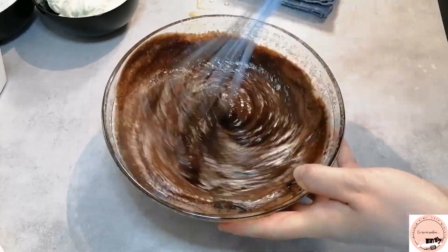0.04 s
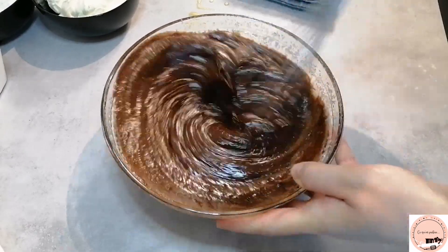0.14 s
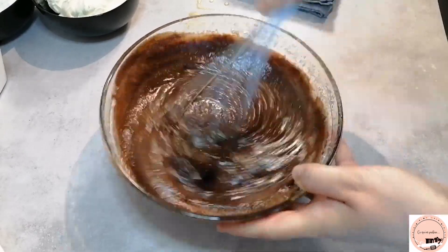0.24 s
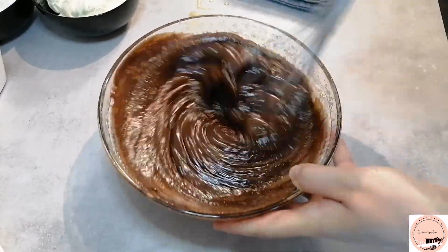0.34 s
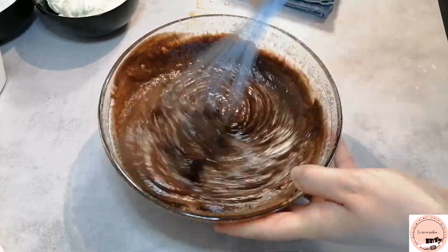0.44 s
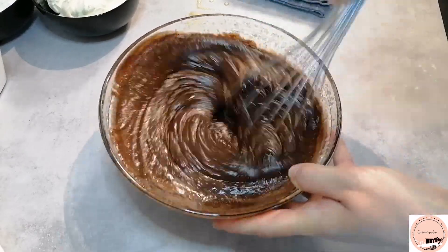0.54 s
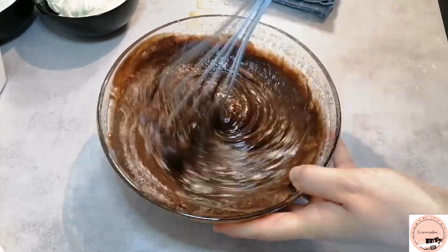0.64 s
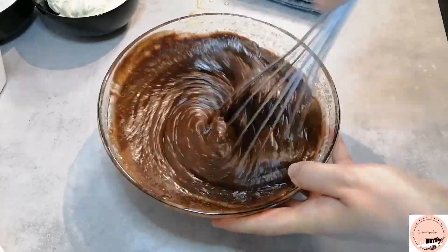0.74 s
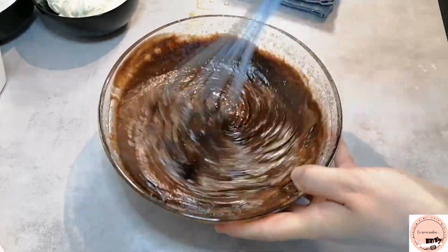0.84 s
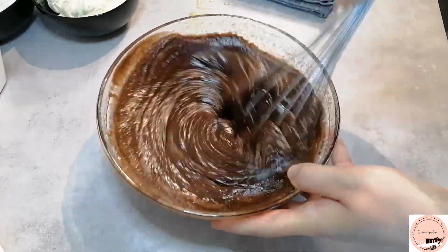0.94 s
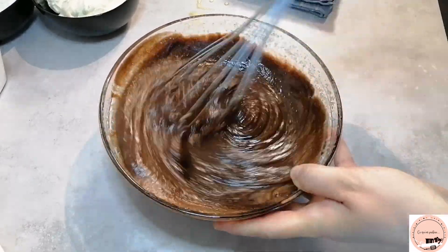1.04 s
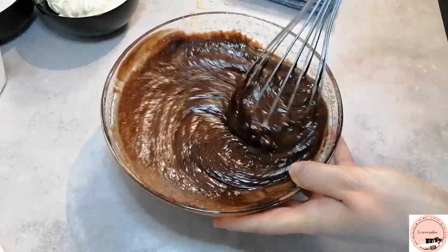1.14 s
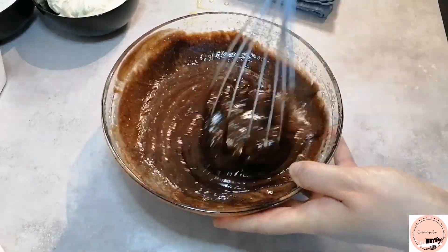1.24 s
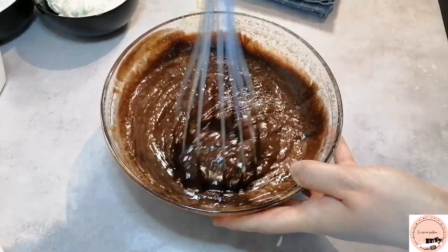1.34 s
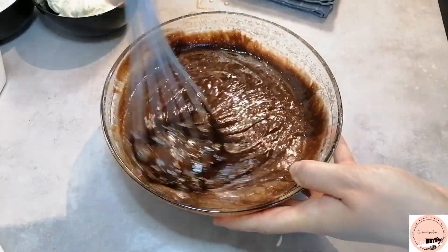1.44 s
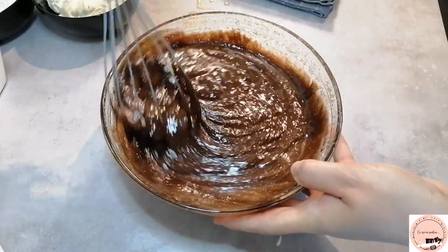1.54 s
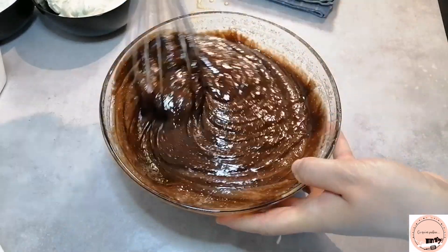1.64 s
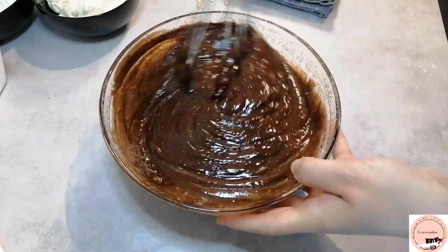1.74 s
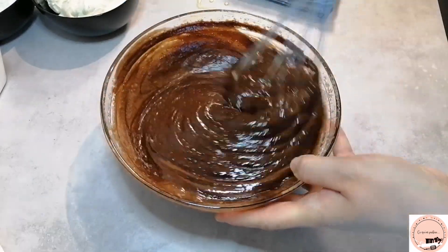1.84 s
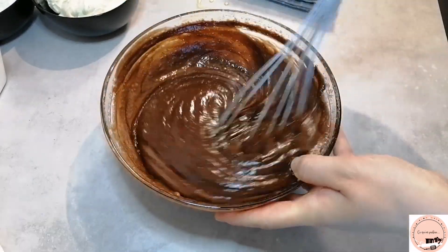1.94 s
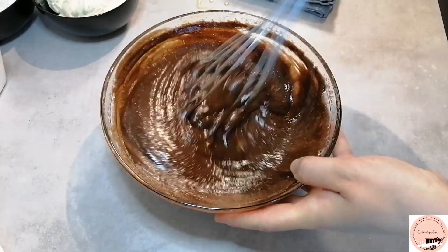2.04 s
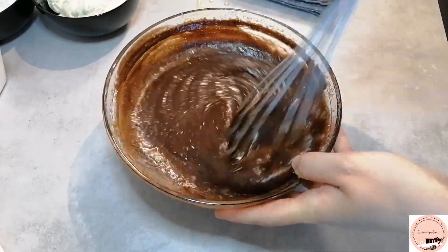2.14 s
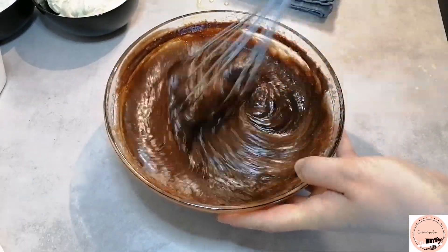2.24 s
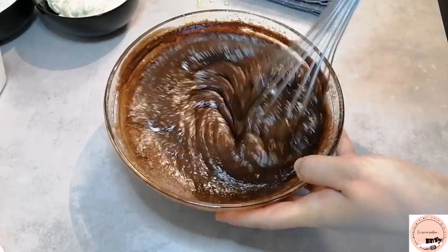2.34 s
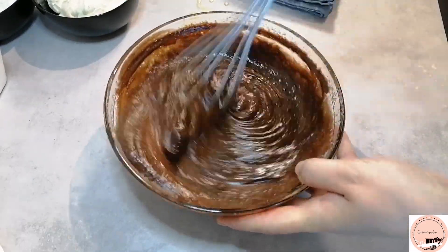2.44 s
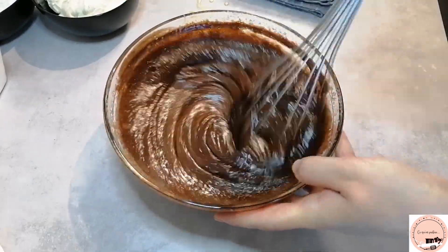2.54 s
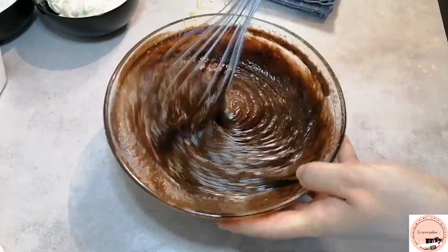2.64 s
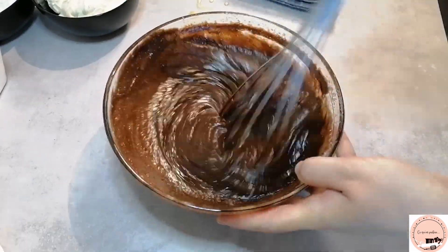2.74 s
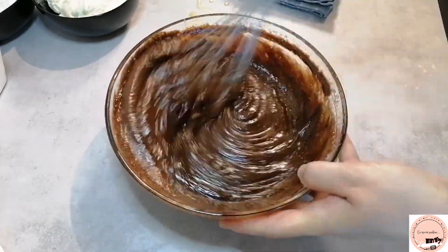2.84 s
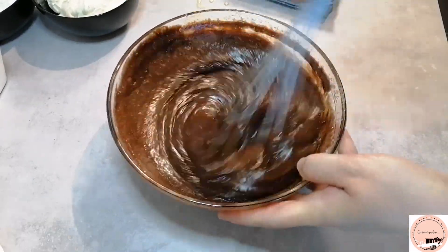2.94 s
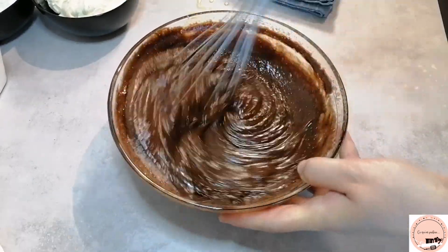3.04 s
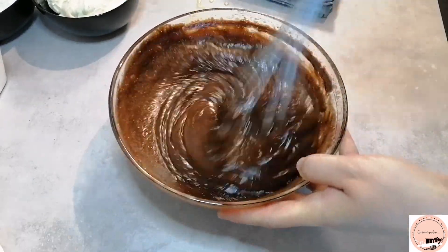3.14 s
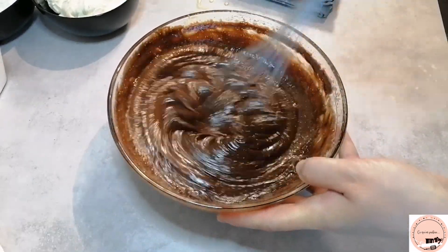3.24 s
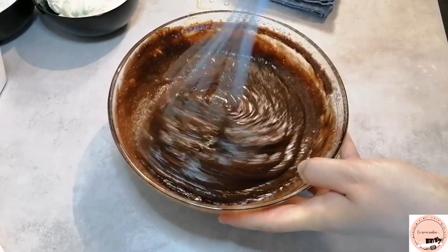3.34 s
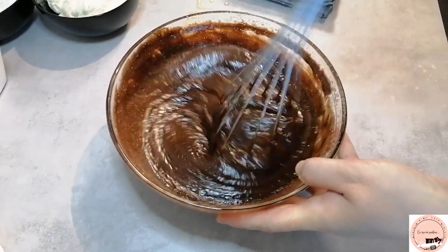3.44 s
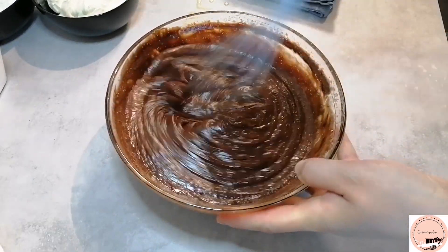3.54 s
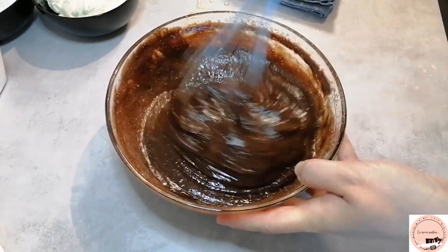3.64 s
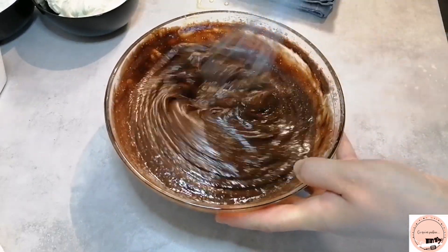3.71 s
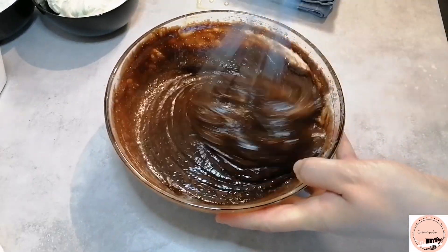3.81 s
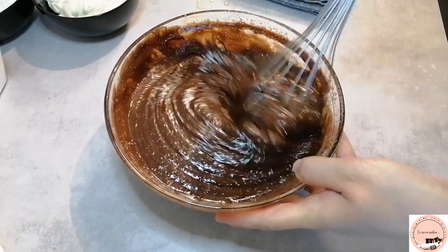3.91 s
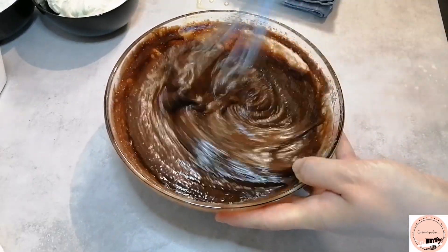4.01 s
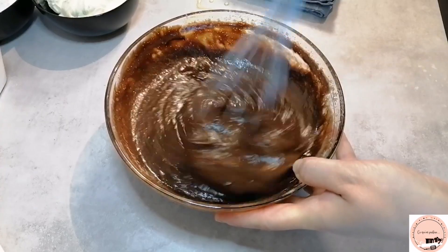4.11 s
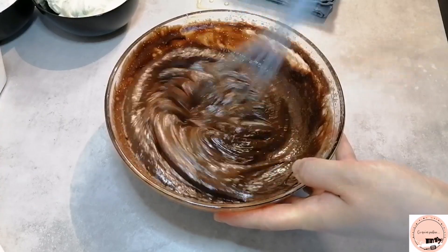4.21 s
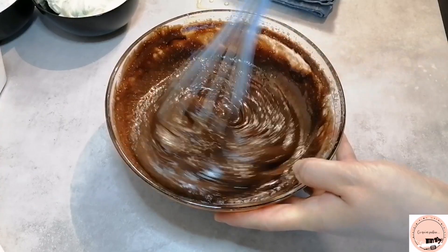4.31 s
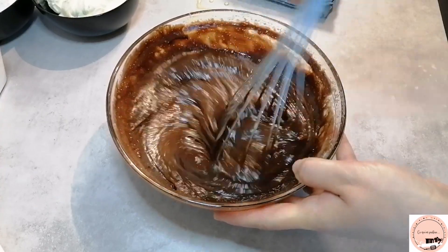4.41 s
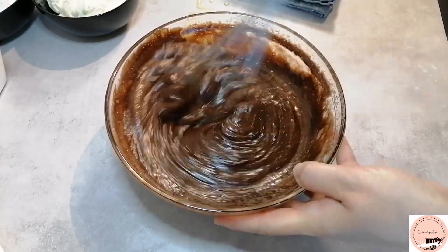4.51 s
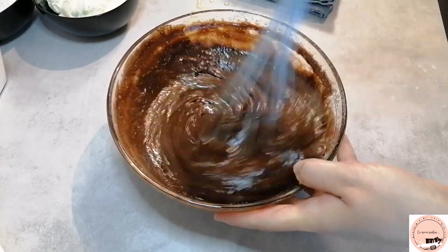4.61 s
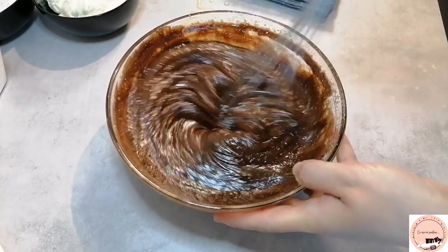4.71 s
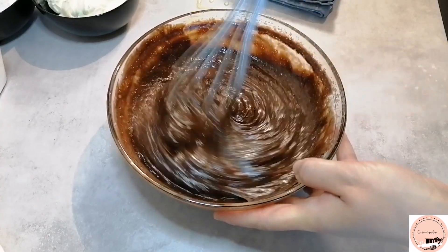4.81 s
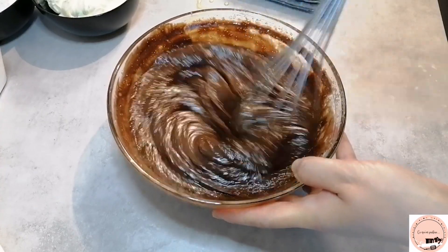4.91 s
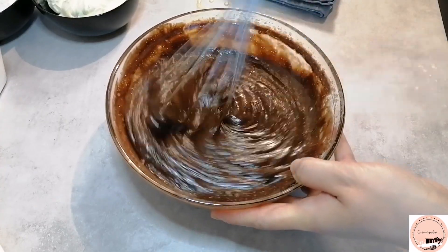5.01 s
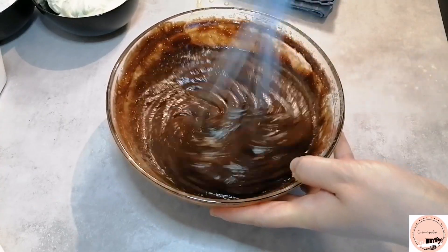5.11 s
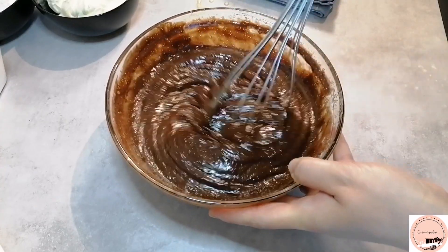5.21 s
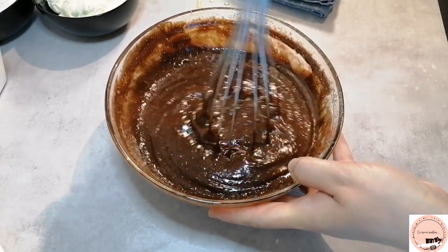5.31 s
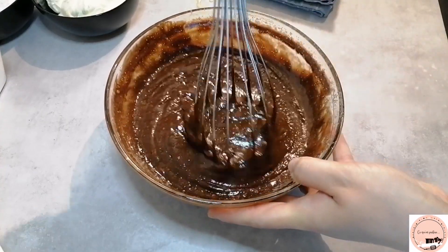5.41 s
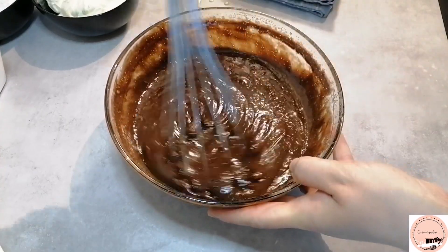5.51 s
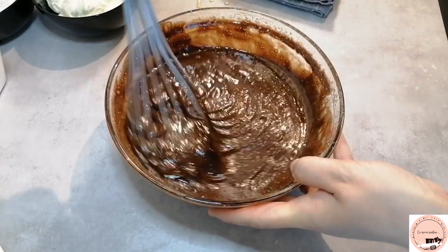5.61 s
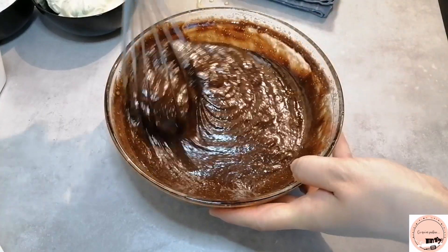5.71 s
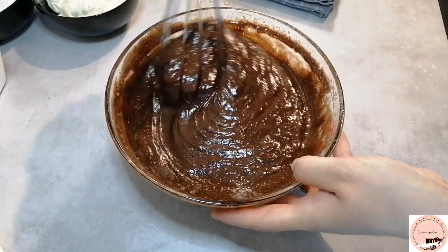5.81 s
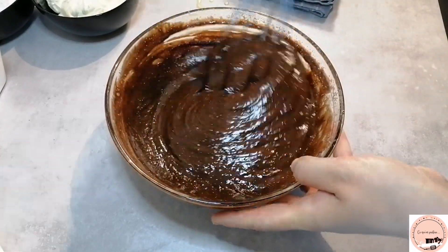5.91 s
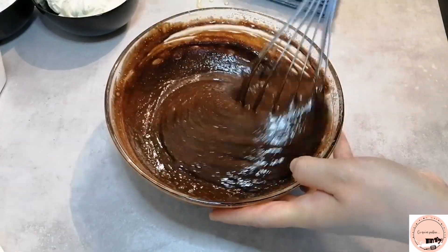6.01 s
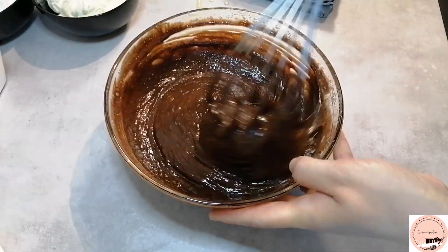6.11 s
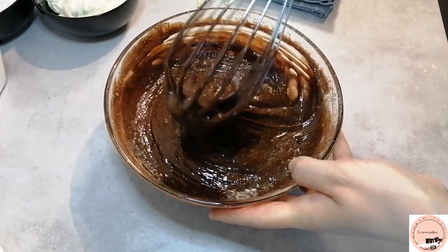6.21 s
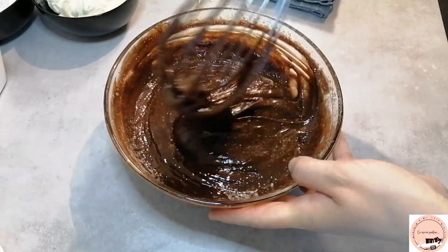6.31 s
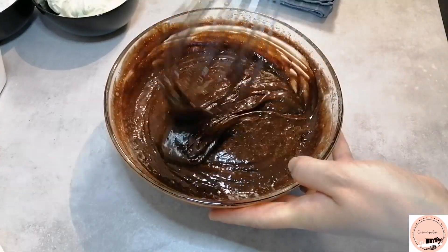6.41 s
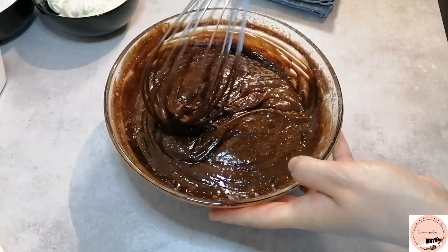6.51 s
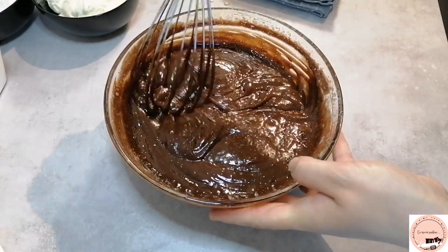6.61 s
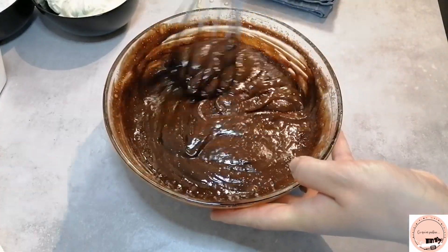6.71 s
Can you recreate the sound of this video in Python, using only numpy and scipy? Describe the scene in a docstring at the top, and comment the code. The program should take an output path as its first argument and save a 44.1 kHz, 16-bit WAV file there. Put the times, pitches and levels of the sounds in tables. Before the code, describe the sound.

A wire whisk stirs thick batter in a glass bowl with quick clinks, then beats hard and fast, then slows to scattered taps and wiry scrapes.

```python
"""A wire whisk beats thick batter in a glass bowl: stirring, then about two seconds of six hard strokes a second.
Each touch of the glass mixes a bright tick of wire, a clonk from the whisk's low notes and a thud of the bowl.
Between touches the batter churns and crackles, made from many tiny random knocks and snaps.
Now and then dragged wires rasp and sing, single wires ping and air pockets gulp.
Behind it all are a short kitchen echo and a quiet room made from shaped noise."""
import sys
import numpy as np
from scipy import signal
from scipy.fft import rfft, irfft
from scipy.io import wavfile
from scipy.ndimage import uniform_filter1d

SR = 44100
rng = np.random.default_rng(int(sys.argv[2]) if len(sys.argv) > 2 else 0)


def int16_out(signal):
    """Quantize to a 16-bit WAV file."""
    q = np.round(np.clip(np.atleast_2d(signal).T, -1, 1) * 32767)
    wavfile.write(sys.argv[1], SR, q.astype(np.int16))


N = 298116
TIME = np.arange(N) / SR  # seconds
RING = np.arange(8192) / SR  # seconds since one small sound began
BINS = np.fft.rfftfreq(len(RING), 1 / SR)  # Hz

# Single knocks of a loop on the glass; bareness 0 = coated in batter, 1 = bare wire; levels are relative:
# start_s, force_db, bareness, thud_db
KNOCKS = [(.048, -37, 0.1, -38.5), (.083, -39.5, 0, -42), (0.136, -39.5, .2, -45), (.18, -35, 0.02, -38),
          (.229, -39.5, 0.74, -50), (.263, -35, 0.36, -40), (.329, -40, 0.4, -49), (.402, -37, 0.55, -38.5),
          (.453, -41, 0.68, -46), (0.471, -34.5, 0.01, -44), (.54, -36.5, 0.12, -43.5),
          (.593, -42, 0, -49.5), (.611, -46.5, 0.97, -58), (0.659, -32.5, 0.23, -42),
          (0.727, -41.5, 0.55, -64), (.851, -31, 0.17, -39), (.869, -35, 0, -67), (.924, -35.5, .25, -47),
          (1.039, -38, 0.15, -57), (1.128, -56.5, 0, -58), (1.274, -59.5, 1, -69), (1.357, -53, 0, -52),
          (1.379, -57, 0.1, -47.5), (1.41, -51, 0.23, -50), (1.441, -43.5, 0.21, -52),
          (1.497, -46, 0.92, -77), (1.689, -46, 0.8, -57), (1.704, -62, 1, -66), (2.002, -44.5, 0, -48),
          (2.055, -39.5, 0.28, -51), (2.08, -39.5, 0.4, -45), (2.111, -39, 0.4, -57),
          (2.133, -38.5, 0, -51), (2.206, -37.5, 0.17, -50), (2.258, -37.5, 0.25, -48),
          (2.29, -34.5, .2, -44), (2.342, -33, 0.22, -41), (2.377, -33.5, 0.39, -36),
          (2.439, -39, 0.5, -41.5), (2.472, -37, 0, -43), (2.544, -34.5, .25, -39),
          (2.59, -39.5, 0.26, -42.5), (2.631, -35.5, 0.34, -37.5), (2.712, -37, .2, -49),
          (2.825, -36, 0.23, -37.5), (3.662, -39.5, 1, -44.5), (4.587, -45, 0, -40),
          (5.151, -35, 0.1, -46.5), (5.481, -41.5, 0.51, -44.5), (5.569, -45.5, 0.11, -58),
          (5.662, -34.5, 0.82, -54), (5.704, -41, 0.74, -66), (5.738, -41, 0.64, -57),
          (5.854, -41.5, 0.41, -50), (6.132, -58.5, 0.62, -77), (6.387, -55, 1, -80),
          (6.567, -37, 0.34, -45), (6.651, -39.5, .5, -54), (6.657, -35, 0.78, -66)]
# Hard strokes; a graze comes before the blow (0 = none) and a rebound after it; levels are relative:
# blow_s, force_db, bareness, thud_db, clonk_centre_hz, graze_before_s, rebound_after_s, rebound_db
STROKES = [(2.865, -33, 0.068, -44, 650, 0.00074, 0.022, -1.5),
           (3.028, -32.5, 0.033, -34.5, 610, 0.028, .024, -4),
           (3.201, -27.5, 0.17, -36, 726, .009, 0.031, -11),
           (3.37, -32.5, 0.16, -33.5, 720, 0.032, 0.014, -0.5),
           (3.524, -32, 0.33, -43, 610, 0.029, 0.017, 4),
           (3.673, -27.5, 0.13, -40, 770, 0.000047, 0.018, -8),
           (3.825, -34, 0.73, -35.5, 626, 0.00061, .026, 2),
           (4.004, -32.5, 0.19, -42.5, 890, 0.00052, 0.038, -11),
           (4.17, -31, 0.23, -35.5, 790, 0, 0.026, -17), (4.327, -35, 0.38, -39, 754, .025, .017, -2),
           (4.469, -32, .25, -37, 750, .018, 0.029, 2.5), (4.649, -34.5, .15, -37.5, 780, 0.0013, 0.023, 1),
           (4.826, -35, 0.13, -37.5, 803, .008, 0.018, 3),
           (4.981, -31, 0.088, -37.5, 660, 0.021, 0.024, -0.5)]
# Low notes of the whisk, before small random shifts: pitch_hz, level_db, fall_by_60db_s, left_minus_right_db, left_lead_rad
WHISK_MODES = [(311, -5.5, 0.13, -3, -0.9), (355.7, 0.5, 0.13, -4.5, -0.4),
               (416.6, -5.5, 0.096, -17.5, 0.1), (458.6, 2, 0.12, 3.5, -2.5), (531, -7.5, 0.05, -21, 3.5),
               (598.5, -12.5, 0.21, 8.5, 2), (650, -1, 0.056, 13.5, 1.4), (780, -4, 0.05, 17.5, 1.2),
               (846.4, -2, 0.056, -1.5, -0.35), (912.6, 4, 0.055, 7.5, -0.7), (1003, -6, 0.081, 15.5, 2.4),
               (1170, 0.5, 0.047, -5.5, -2), (1278, -3.5, 0.056, -5, 0.2), (1640, -19, 0.068, 6, 10),
               (1800, 4.5, 0.037, -1, 4.5)]
# Low notes of the bowl on the counter, also shifted a little: the same columns
COUNTER_MODES = [(66, -10.5, 0.15, 10, .05), (119.7, 3.5, 0.15, 4.5, 0.048), (163.9, 4, 0.11, 7, 0.12),
                 (180, -42.5, 0.092, -12, .1)]
# Resonances of wires against the glass: pitch_hz, width_hz, above_broad_sound_db
WIRES = [(3060, 92, 0.5), (4500, 47, 7), (4850, 210, 0), (5250, 160, -3), (5890, 300, -0.5),
         (7680, 310, -1), (8320, 340, -0.5), (9270, 330, 1), (10130, 100, 6.5)]
# Broad tone of a tick, before it is tilted brighter or duller: pitch_hz, relative_level_db
TICK = [(500, -4.5), (1200, -5), (1700, 2), (2300, -4.5), (3300, 5), (3900, -3), (4700, 3.5), (6500, 1),
        (8000, 3.5), (10500, -1.5), (13000, -6), (16000, -11)]
# Left-right balance by pitch: pitch_hz, left_minus_right_db
TREBLE_BALANCE = [(1200, 0.5), (2800, 2), (3300, -2), (4000, -2), (5200, -2), (6200, -4.5), (7200, -20.5),
                  (8100, -3), (9500, 1), (16000, -2.5)]
# Single wires plucked clear of the batter: start_s, pitch_hz, level_db, fall_by_60db_s
PINGS = [(.54, 3040, -42.5, 0.035), (0.852, 3050, -38, 0.084), (1.206, 2790, -45.5, 0.02),
         (1.241, 2790, -47.5, 0.017), (1.623, 3080, -50.5, 0.08), (1.707, 7420, -26, .053),
         (1.707, 5330, -27.5, 0.029), (3.827, 1470, -34.5, 0.026), (4.171, 4840, -33.5, 0.035),
         (5.152, 3240, -38, 0.061), (5.48, 1353, -39.5, 0.043), (5.48, 7560, -38, 0.035),
         (5.482, 3060, -51, .08), (5.663, 4500, -36.5, 0.044), (6.337, 7000, -43.5, 0.02),
         (6.39, 1690, -45.5, .034), (6.442, 2820, -56, 0.082), (6.569, 3096, -45, 0.061)]
# Air pockets gulping shut behind the loops: start_s, pitch_hz, relative_level_db, length_s
GULPS = [(0.4033, 567, -27.5, 0.027), (1.128, 538, -50, 0.02)]
# Resonances of an air pocket: multiple_of_pitch, relative_level_db, share_of_length
POCKET = [(1, 0, 0.99), (1.69, -3, 0.48)]
# How hard the hand drives the whisk through the batter: time_s, relative_effort_db
EFFORT = [(0, -53.5), (.15, -52), (.7, -54.5), (1.0, -59.5), (1.27, -71), (1.41, -65), (1.62, -63),
          (1.93, -63.5), (2.1, -50), (2.19, -58), (2.52, -43.5), (2.8, -52), (3.15, -61), (3.42, -61),
          (3.6, -73.5), (5.0, -62.5), (5.4, -72), (6.76, -72.5)]
# Broad tone of the batter's crackle: pitch_hz, relative_level_db
CRACKLE = [(500, 3), (1200, 2.5), (2200, 0), (3200, 4), (3900, -8), (5000, -2.5), (7000, 1.5), (9000, -7),
           (12000, -9.5), (16000, -15)]
# Wires dragged along the glass: start_s, length_s, relative_pressure_db, chatter_db
DRAGS = [(1.459, 0.13, -53, -59.5), (1.638, 0.031, -54.5, -52.5), (1.684, 0.12, -40, -63),
         (1.786, 0.03, -44, -49.5), (5.172, 0.091, -56, -66), (5.496, 0.16, -58, -57),
         (5.651, 0.23, -55, -54.5), (5.899, 0.032, -47.5, -58.5), (6.68, 0.13, -56, -65)]
# Broad tone of the rasp: pitch_hz, relative_level_db
RASP = [(500, -1), (1200, 4), (1750, -2.5), (2200, 8.5), (2600, -8), (3500, 1.5), (3900, -6), (4600, -2.5),
        (7000, -2.5), (9000, -1), (12000, -0.5), (16000, -10)]
# Resonances of rubbed wires: pitch_hz, width_hz, above_broad_sound_db
RUBBED = [(2914, 86, 20), (4660, 140, 12.7), (5250, 120, 13), (5790, 130, 17.5), (6750, 320, 12.5),
          (8160, 250, 5.1), (8900, 330, 9.1), (9600, 300, 6.8)]
# Wire notes that sing under a hard drag, before small random shifts:
# pitch_hz, level_db, fall_by_60db_s, left_minus_right_db, left_lead_rad
SINGING = [(3270, -10, 0.073, 4, 0.52), (4300, -6, 0.037, 2, -0.47), (5670, 0, 0.028, 3, 1),
           (5740, -5, 0.018, -14, 0.26), (7620, -0.5, 0.071, -21, 0.59), (7840, 1, 0.061, -9, -1.2)]
# Echo time of the kitchen: pitch_hz, fall_by_60db_s
KITCHEN = [(100, 0.39), (700, 0.079), (2000, 0.22), (7000, 0.25), (15000, 0.18)]
# Tone of the quiet room: pitch_hz, relative_level_db
HUSH = [(12, -34), (20, -7), (74, -2.5), (222, -16), (301, -13), (347, -20), (976, -46), (1060, -29),
        (1400, -32.5), (7310, -37.5), (11800, -37.5), (16000, -38)]
# How alike the room sounds on both sides: pitch_hz, likeness (0-1)
HUSH_SAME = [(30, 0.56), (150, 0.52), (600, 0.16), (2000, 0.093), (16000, .05)]

# What a bare wire changes against a coated one
COATED_TICK_DB, BARE_TICK_DB, BARE_CLONK_DB, BARE_BRIGHTER = -12.5, 14.5, -13.5, 0.44
STIR_TICK_HZ, BEAT_TICK_HZ, STIR_CLONK_HZ = 4970, 5280, 660  # tick values are for a coated wire
# The other touches of a stroke, set against its blow (the rebound's bareness is its own)
GRAZE_DB, GRAZE_BARER, GRAZE_THUD_DB = -7, 0.084, -7.5
REBOUND_BARENESS, REBOUND_THUD_DB = 0.31, -5.5
ROCK_BACK_S, ROCK_BACK_DB = 0.12, -19.5  # after the blow, against its thud
DRAG_ATTACK_S, DRAG_RELEASE_S = 0.025, 0.031
HUSH_DB = -62.5  # before a small left-right tilt
EDGE_HZ = 15900


def knocks(clonk_db=-3.0, thud_db=-2.5, brightening=4.6, crack_db=-8, bare_db=20):
    """Each touch: a bright tick of wire on glass, the whisk's clonk, the bowl's thud."""
    ticks, body = np.zeros((2, N)), np.zeros((2, N))
    wires = colour(TICK, WIRES)
    for s, tick_level, tick_hz, clonk_level, clonk_hz, thud_level in contacts():
        # a bare wire hits bright and with a crack, a coated one is dull
        brightness = np.log(tick_hz / 6200)
        tilt = (np.clip(BINS, 2500, 11000) / 6000) ** (brightening * brightness)
        # a glancing tap is over sooner than a deep push
        dwell = amp(np.clip(clonk_level - tick_level, -12, 5) - 5.0)
        tick = burst(wires * tilt, fall_s=0.0077 * dwell, tail_db=3.0, tail_s=0.018 * dwell,
                     rise_s=0.0012, patchy_db=4.5)
        crack = burst(wires * BINS, fall_s=0.0026, tail_db=-22, tail_s=0.01, rise_s=0.00071, patchy_db=3.5)
        crack_level = tick_level + crack_db + bare_db * brightness
        add(ticks, s, amp(tick_level) * tick / rms(tick[:, :SR // 100]))
        add(ticks, s, amp(crack_level) * crack / rms(crack[:, :SR // 100]))

        middle, low = clonk(clonk_hz), thud()
        add(body, s, amp(clonk_level + clonk_db) * middle / rms(middle[:, :SR // 70]))
        add(body, s, amp(thud_level + thud_db) * low / rms(low[:, :SR // 50]))
    return ticks, body


def contacts():
    """All touches: single knocks, and for each stroke a light graze (if any), the blow and its rebound."""
    touches = [contact(*knock, STIR_TICK_HZ, STIR_CLONK_HZ) for knock in KNOCKS]
    for s, force_db, bare, thud_db, clonk_hz, graze_s, rebound_s, rebound_db in STROKES:
        blow = (s, force_db, bare, thud_db)
        rebound = (s + rebound_s, force_db + rebound_db, REBOUND_BARENESS, thud_db + REBOUND_THUD_DB)
        stroke = [blow, rebound]
        if graze_s > 0:
            graze = (s - graze_s, force_db + GRAZE_DB, bare + GRAZE_BARER, thud_db + GRAZE_THUD_DB)
            stroke.insert(0, graze)
        touches += [contact(*touch, BEAT_TICK_HZ, clonk_hz) for touch in stroke]
    return touches


def contact(s, force_db, bare, thud_db, tick_hz, clonk_hz):
    """One touch as (s, tick dB, tick Hz, clonk dB, clonk Hz, thud dB): bare wire ticks, coated wire clonks."""
    bare = np.clip(bare, 0, 1)
    tick_db = force_db + COATED_TICK_DB + BARE_TICK_DB * bare
    bright_hz = tick_hz * (1 + BARE_BRIGHTER * bare)
    clonk_db = force_db + BARE_CLONK_DB * bare
    return s, tick_db, bright_hz, clonk_db, clonk_hz, thud_db


def clonk(centre_hz, octaves=0.51, detune=0.021):
    """The whisk's low notes; the point of contact favours some, and clinging batter shifts them."""
    distance = np.log2(np.array(WHISK_MODES)[:, 0] / centre_hz) / octaves
    favour = 1 / (1 + distance ** 2)
    real, imaginary, shift = rng.standard_normal((3, len(WHISK_MODES)))
    return ring(WHISK_MODES, favour * (real + 1j * imaginary), 1 + detune * shift, rise_s=0.0028)


def thud(vary_db=3, detune=0.053):
    """The bowl pushed against the counter; the hand's grip changes its notes a little each time."""
    share, shift = rng.standard_normal((2, len(COUNTER_MODES)))
    return ring(COUNTER_MODES, amp(vary_db * share), 1 + detune * shift, rise_s=0.0063)


def rock_back():
    """The bowl settles on the counter again as the whisk swings back from each stroke."""
    out = np.zeros((2, N))
    for s, _, _, thud_db, *_ in STROKES:
        low = thud()
        add(out, s + ROCK_BACK_S, amp(thud_db + ROCK_BACK_DB) * low / rms(low[:, :SR // 50]))
    return out


def batter(crackle_db=-2, churn_db=-2, rock_db=-7, tear_db=-3, slosh_db=-6):
    """Sticky films snap between the wires while the loops jostle and rock the bowl."""
    wet = colour(CRACKLE, WIRES)
    snaps = [burst(wet, fall_s=0.0064, tail_db=-10, tail_s=0.015, rise_s=0.00038, patchy_db=9.0)
             for _ in range(20)]
    crackle = grains([snap / rms(snap) for snap in snaps], per_s=700, spread_db=5)
    jostles = [clonk(hz) for hz in np.geomspace(400, 900, num=12)]
    churn = grains([jostle / rms(jostle) for jostle in jostles], per_s=400, spread_db=2)
    rock = grains([thud() for _ in range(4)], per_s=96, spread_db=2.5)

    # crackle and churn follow the stirring hand and swell around each knock
    stirring = amp(np.interp(TIME, *np.transpose(EFFORT)))
    crackle *= np.hypot(amp(crackle_db) * stirring, amp(tear_db) * follow_through(order=1))
    churn *= np.hypot(amp(churn_db) * stirring, amp(slosh_db) * follow_through(order=3))
    return crackle, churn + amp(rock_db) * rock * stirring


def follow_through(order, rise_s=0.014, fall_s=0.029, run_in_db=-9, run_in_s=0.0039):
    """Loops plough up to each knock and run on after it; sized by its tick (order 1) or clonk (order 3)."""
    power, before = np.zeros((1, N)), RING[:SR // 25]
    run_in = amp(run_in_db) * np.exp(-before[::-1] / run_in_s)
    run_on = (1 - np.exp(-RING / rise_s)) * np.exp(-RING / fall_s)
    shape = np.concatenate([run_in, run_on])
    for knock in contacts():
        swell = amp(knock[order]) * shape
        add(power, knock[0] - before[-1], swell[None] ** 2)
    return np.sqrt(power[0])


def sweeps(rasp_db=-2, sing_growth=1.37):
    """Wires stick and slip along the glass; the harder they are pressed, the more their notes sing out."""
    rubbed = colour(RASP, RUBBED)
    pressure, judder = dragging()
    slips = [burst(rubbed, fall_s=0.003, tail_db=-13, tail_s=0.012, rise_s=0.0004, patchy_db=3.5)
             for _ in range(12)]
    rasp = grains(slips, per_s=600, spread_db=3.5) * pressure

    count = len(SINGING)
    notes = [ring(SINGING, rng.uniform(0.5, 1.5, count), 1 + 0.012 * rng.standard_normal(count), rise_s=0.0005)
             for _ in range(10)]
    hardest = pressure.max()
    song = grains(notes, per_s=700, spread_db=11.5) * hardest * abs(pressure / hardest) ** sing_growth

    rattles = [clonk(hz, detune=0.08) for hz in np.geomspace(380, 1400, num=6)]
    chatter = grains(rattles, per_s=460, spread_db=9.5) * judder
    return amp(rasp_db) * rasp + song, chatter


def dragging():
    """Pressure and chatter over time: each drag bites, holds and lets go."""
    total = np.zeros((2, N))
    for s, length, pressure_db, chatter_db in DRAGS:
        bite = np.clip((TIME - s) / DRAG_ATTACK_S, 0, 1)
        let_go = np.exp(-np.maximum(TIME - s - length, 0) / DRAG_RELEASE_S)
        total += amp([[pressure_db], [chatter_db]]) * bite * let_go
    return total


def tones():
    """Gives the two lone sounds of the whisk: pinging wires and gulping air pockets."""
    return pings(), gulps()


def pings():
    """A single wire springs free and dies away as one pure note."""
    out = np.zeros((2, N))
    for s, hz, db, t60 in PINGS:
        wave = np.sin(2 * np.pi * hz * RING + [[0], [1]])  # right is one radian ahead
        rise = 1 - np.exp(-RING / 0.00027)
        add(out, s, amp(db - 60 * RING / t60) * wave * rise)
    return out


def gulps(right_lag_s=0.00011, glide=0.04):
    """An air pocket swells, rises slightly in pitch and closes."""
    out = np.zeros((2, N))
    t = RING - np.array([[0], [right_lag_s]])
    for s, hz, db, length in GULPS:
        for ratio, mode_db, share in POCKET:
            age = np.clip(RING / (length * share), 0, 1)
            wave = np.sin(2 * np.pi * hz * ratio * t * (1 + glide * (age - 1)))
            swell = np.sin(np.pi * age ** 0.64)
            add(out, s, amp(db + mode_db + np.array([[3], [-3]])) * swell * wave)  # louder on the left
    return out


def kitchen(x):
    """A short diffuse echo, each pitch band dying at its own speed."""
    hz, t, z = signal.stft(rng.standard_normal((2, SR // 2)), SR, nperseg=256)
    decay = amp(-60 * t / read(KITCHEN, hz)[:, None])
    tail = signal.istft(z * decay, SR, nperseg=256)[1]
    age = np.arange(tail.shape[1]) / SR
    tail = tail * (1 - np.exp(-(age / 0.0009) ** 2))  # soft start
    return convolve(x, tail / np.linalg.norm(tail[0]))


def hush():
    """Steady rumble and faint hiss of the room, the bass more alike in both ears than the treble."""
    hz = np.fft.rfftfreq(N, 1 / SR)
    left, other = rfft(rng.standard_normal((2, N)))
    same = np.clip(read(HUSH_SAME, hz), 0, 1)
    right = same * left + np.sqrt(1 - same ** 2) * other
    air = irfft(np.array([left, right]) * amp(read(HUSH, hz)), N)
    return amp(HUSH_DB) * air / rms(air) * amp([[1.2], [-0.6]])


def burst(gain, fall_s, tail_db, tail_s, rise_s, patchy_db, twist=1.24, twist_hz=2600):
    """Many wire notes struck at once: a quick fall and a longer ring."""
    # each wire has its own notes, so the spectrum is uneven
    patches = uniform_filter1d(uniform_filter1d(rng.standard_normal(len(BINS)), size=90), size=60)
    uneven = gain * amp(patchy_db * patches / rms(patches))
    # reflections in the bowl turn the phase between left and right
    sides = np.outer([0, twist], np.sin(2 * np.pi * BINS / twist_hz))
    phase = 2 * np.pi * rng.random(len(BINS)) + sides + rng.standard_normal(gain.shape)
    cluster = irfft(uneven * np.exp(1j * phase))
    fall = np.exp(-RING / fall_s) + amp(tail_db) * np.exp(-RING / tail_s)
    return cluster * fall * (1 - np.exp(-RING / rise_s))


def ring(modes, weights, tuning, rise_s):
    """Dying notes on the left and right; weights (complex or real) say how each is struck."""
    hz, db, t60, side_db, lead = np.transpose(modes)
    half = [0.5, -0.5]  # share each left-right difference between the sides
    sides = amp(db + np.outer(half, side_db)) * np.exp(1j * np.outer(half, lead)) * weights
    waves = np.exp(np.outer(2j * np.pi * hz * tuning - np.log(1000) / t60, RING))
    return (sides @ waves).imag * (1 - np.exp(-RING / rise_s))


def grains(sounds, per_s, spread_db):
    """Random small contacts, a few of them large, each playing one of the given sounds."""
    size = amp(spread_db * np.minimum(rng.exponential(1, N), 3.5))
    happens = rng.random(N) < per_s / SR
    hits = size * rng.choice([-1, 1], N) * happens
    which = rng.integers(0, len(sounds), N)
    out = sum(convolve(hits * (which == k), sound) for k, sound in enumerate(sounds))
    return out / rms(out)


def colour(broad, peaks):
    """Left and right gain by pitch: a broad spectrum with resonances standing on it."""
    power = 1 + sum(amp(db) ** 2 / (1 + (2 * (BINS - hz) / width) ** 2) for hz, width, db in peaks)
    balance = np.outer([0.5, -0.5], read(TREBLE_BALANCE, BINS))
    return np.sqrt(power) * amp(read(broad, BINS) + balance)


def amp(db):
    """Turns decibels into gain."""
    return 10 ** (np.asarray(db) / 20)


def rms(x):
    """Root mean square over everything: the average strength."""
    return np.sqrt(np.mean(x ** 2) + 1e-20)


def read(points, hz):
    """Reads a table at any pitch, joining its points by lines on a log-frequency axis."""
    f, value = np.transpose(points)
    return np.interp(np.log(hz + 1), np.log(f), value)


def add(mix, s, sound):
    """Mixes a sound in at time s, cutting off what runs past the end."""
    part = mix[:, max(round(s * SR), 0):][:, :sound.shape[1]]
    part += sound[:, :part.shape[1]]


def convolve(x, response):
    """Passes x through a stereo response."""
    return signal.oaconvolve(np.atleast_2d(x), response, axes=1)[:, :N]


def scene():
    """Bright and low sounds of the whisking, their echo and the quiet room."""
    layers = [knocks(), tones(), batter(), sweeps()]
    bright, low = (sum(parts) for parts in zip(*layers))
    low = low + rock_back()
    echo = kitchen(amp(-7.0) * bright + amp(-12.5) * low)
    return bright + low + echo + hush()


def record(dry):
    """A steep low-pass filter removes the treble above EDGE_HZ."""
    low_pass = signal.firwin(511, EDGE_HZ, window=("kaiser", 9), fs=SR)
    return signal.oaconvolve(dry, low_pass[None], "same", axes=1)


dry = scene()
out = record(dry)
int16_out(out)
```